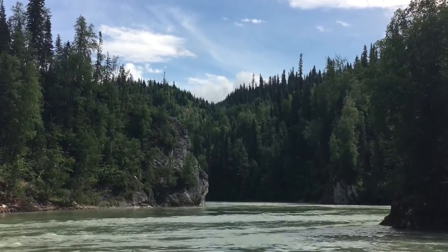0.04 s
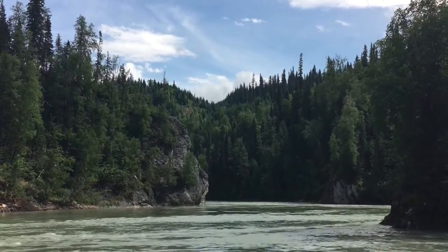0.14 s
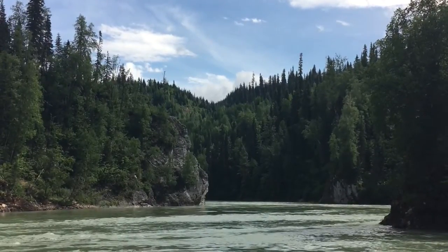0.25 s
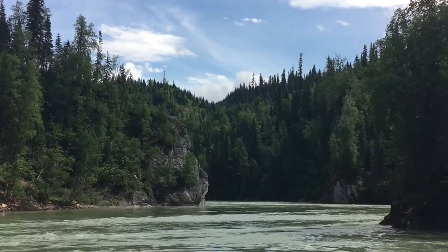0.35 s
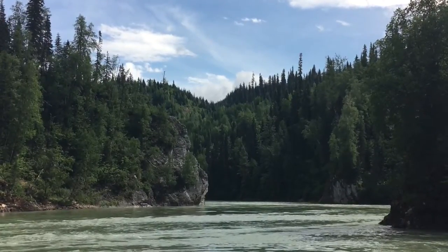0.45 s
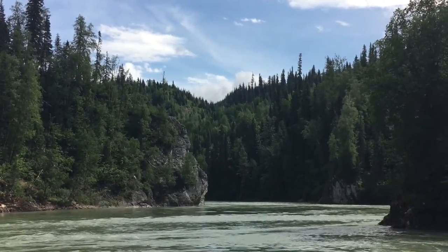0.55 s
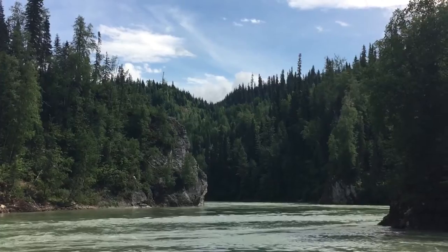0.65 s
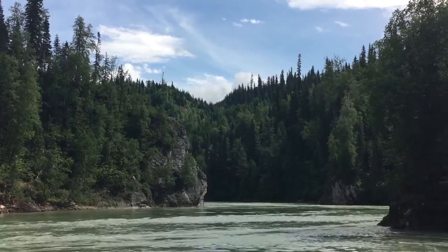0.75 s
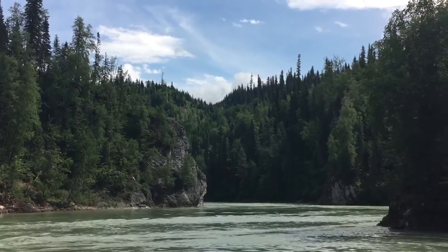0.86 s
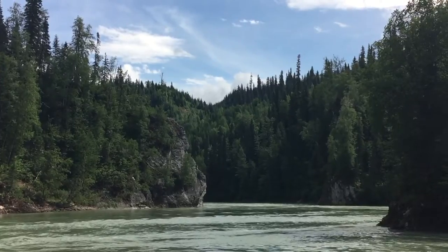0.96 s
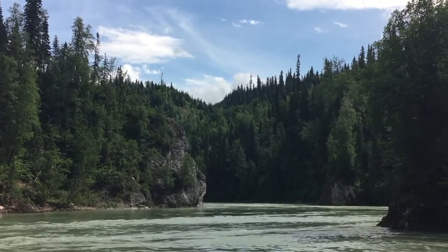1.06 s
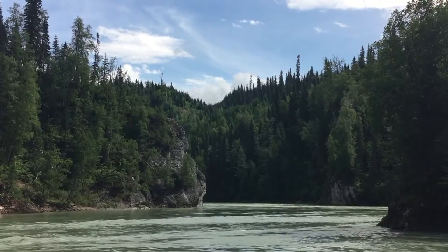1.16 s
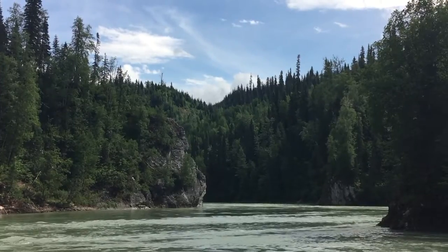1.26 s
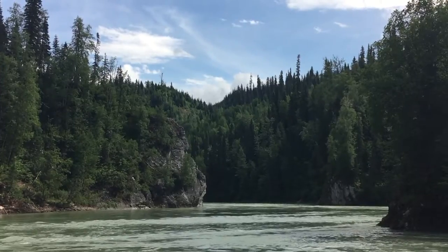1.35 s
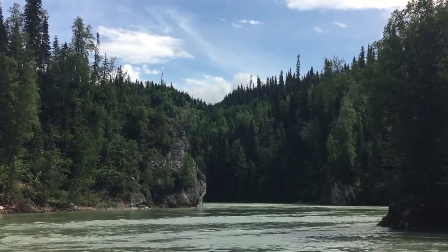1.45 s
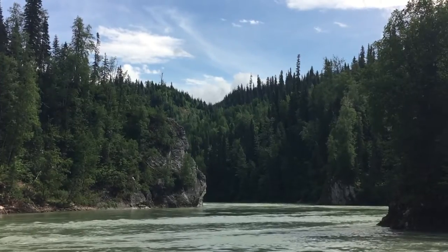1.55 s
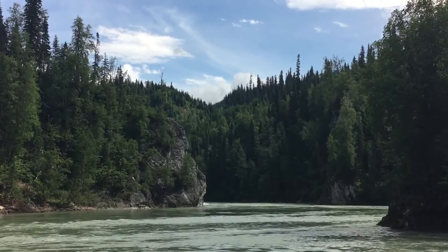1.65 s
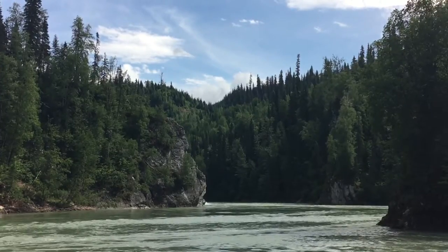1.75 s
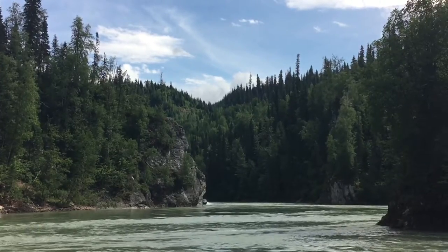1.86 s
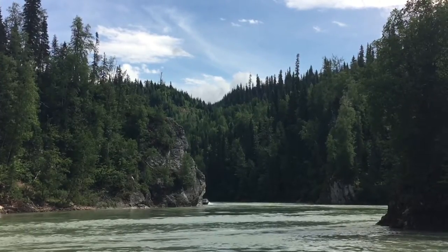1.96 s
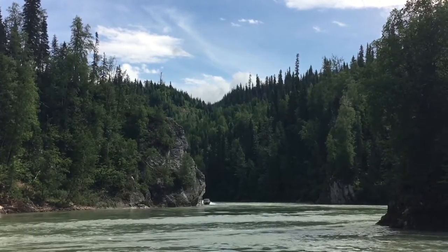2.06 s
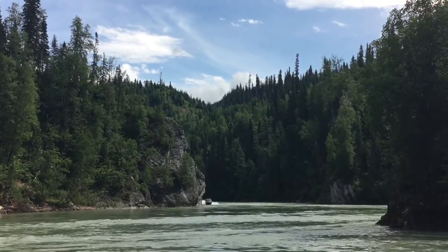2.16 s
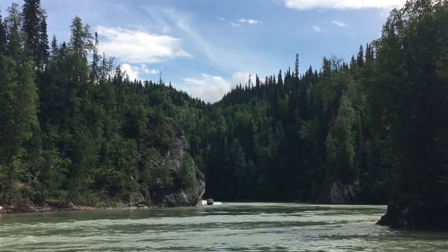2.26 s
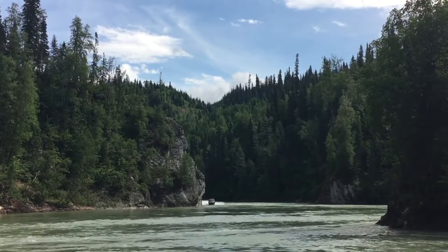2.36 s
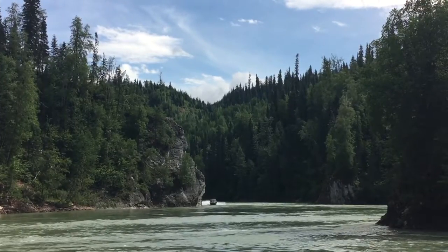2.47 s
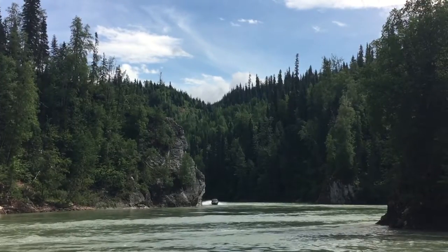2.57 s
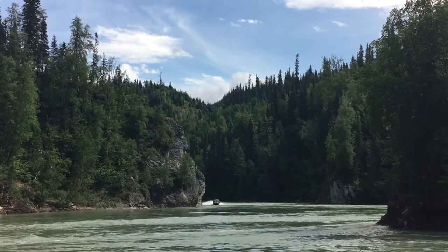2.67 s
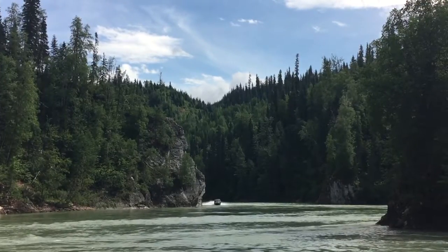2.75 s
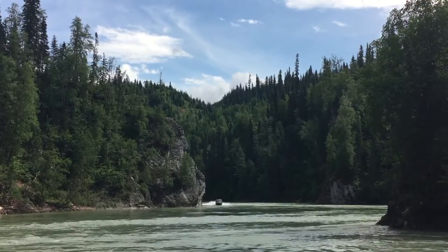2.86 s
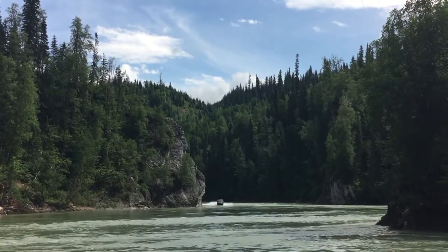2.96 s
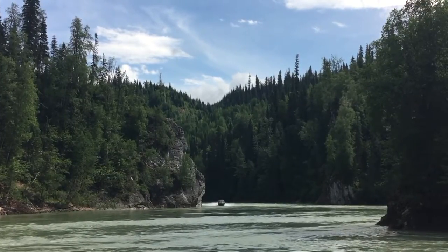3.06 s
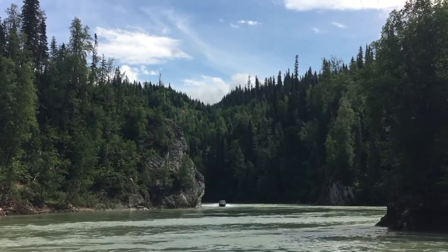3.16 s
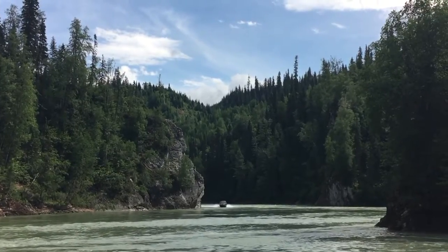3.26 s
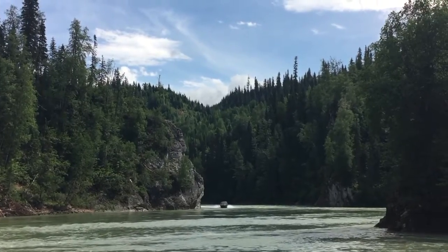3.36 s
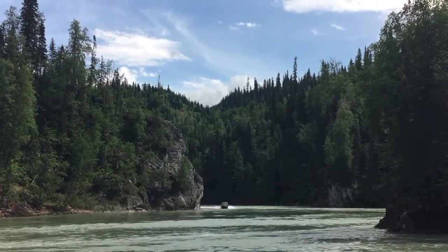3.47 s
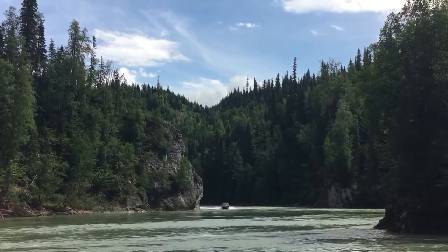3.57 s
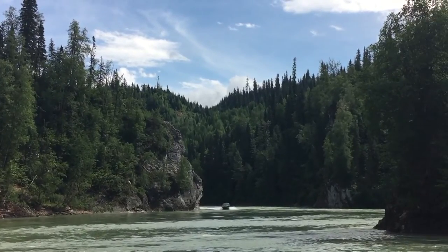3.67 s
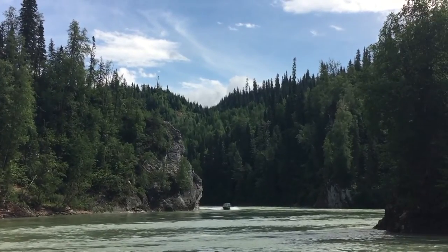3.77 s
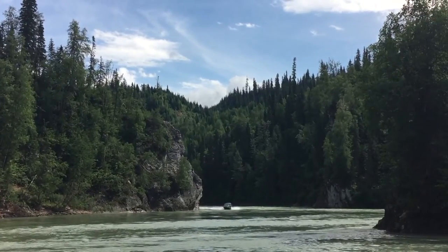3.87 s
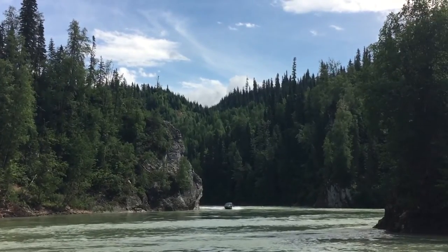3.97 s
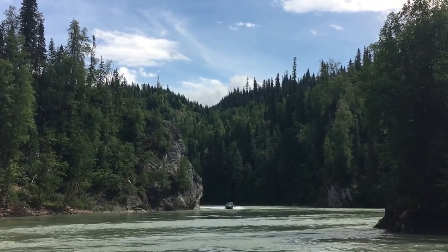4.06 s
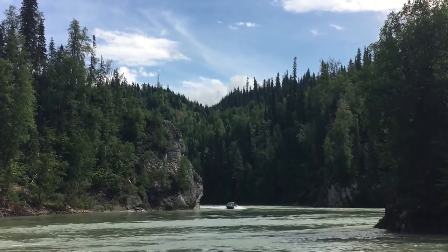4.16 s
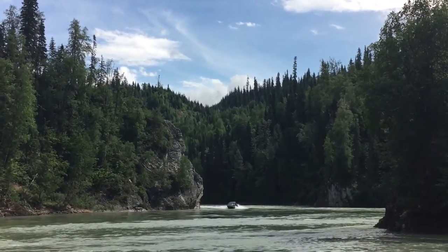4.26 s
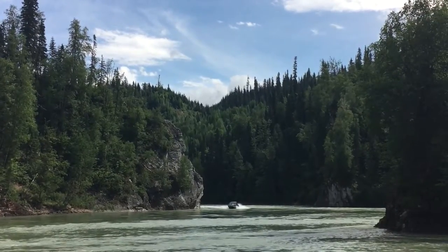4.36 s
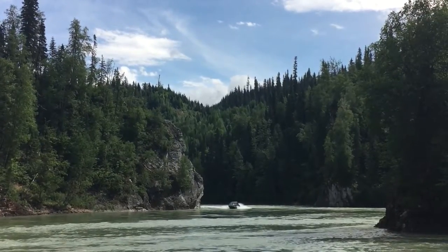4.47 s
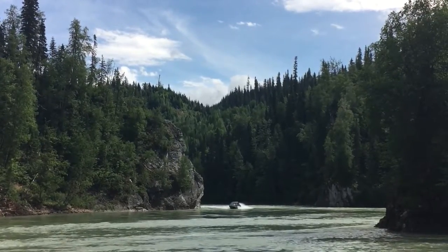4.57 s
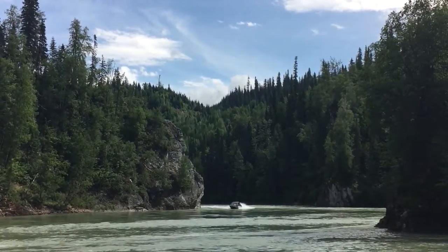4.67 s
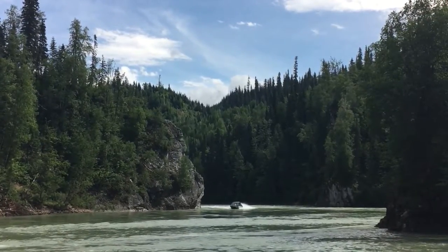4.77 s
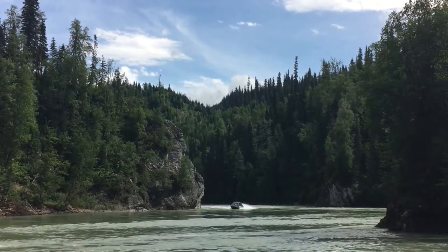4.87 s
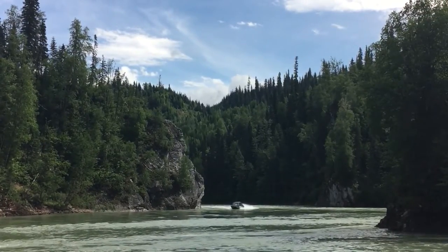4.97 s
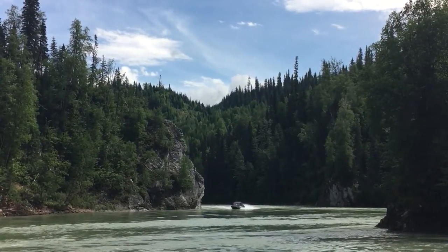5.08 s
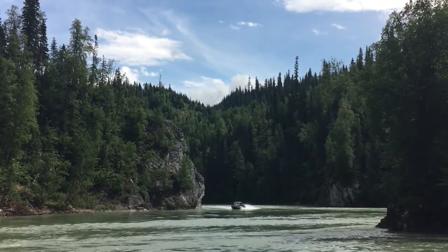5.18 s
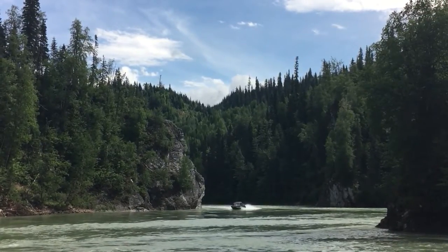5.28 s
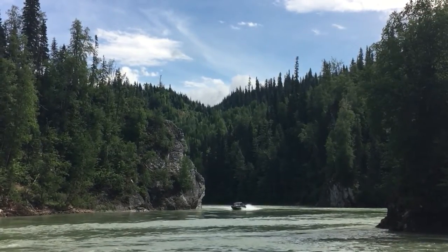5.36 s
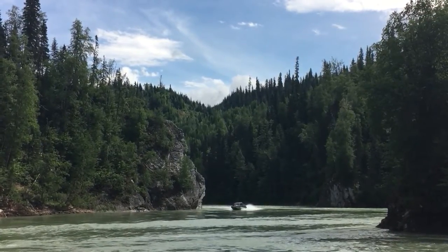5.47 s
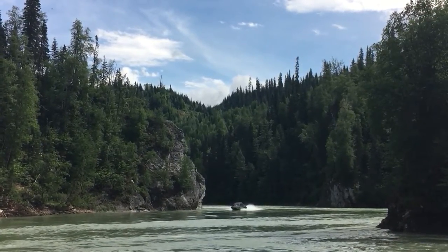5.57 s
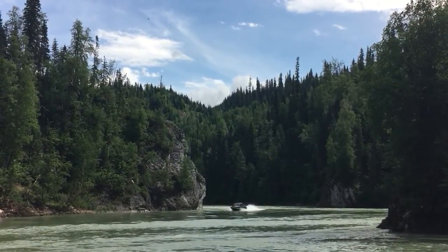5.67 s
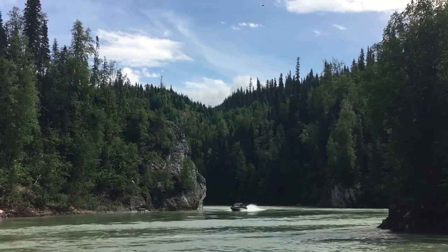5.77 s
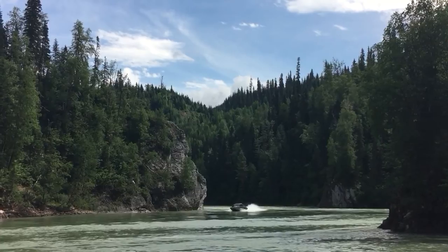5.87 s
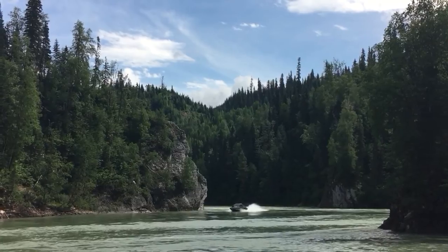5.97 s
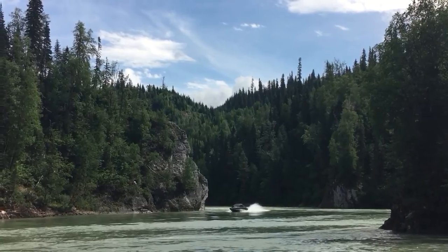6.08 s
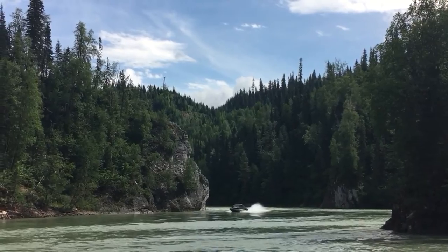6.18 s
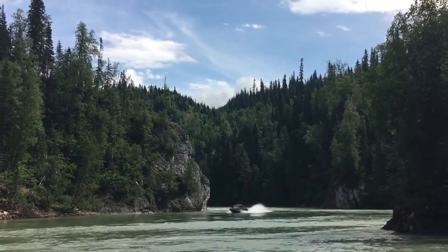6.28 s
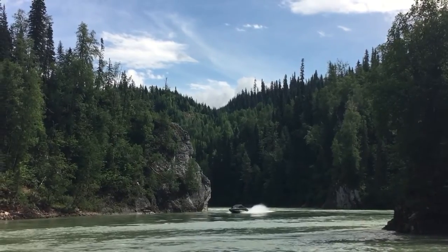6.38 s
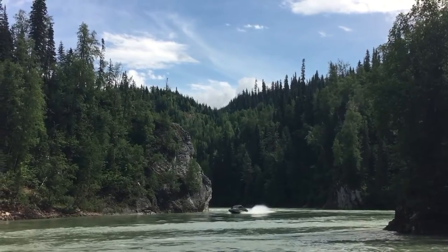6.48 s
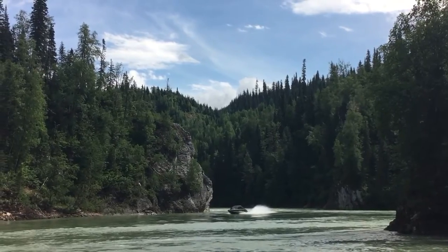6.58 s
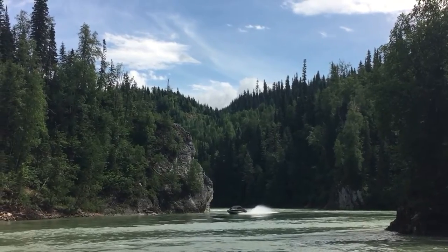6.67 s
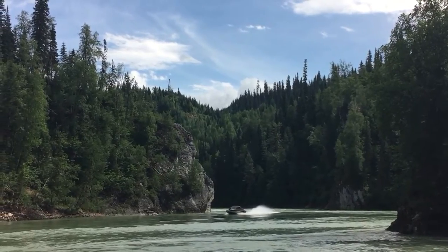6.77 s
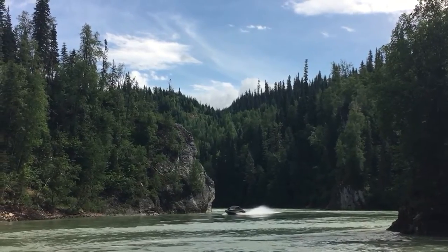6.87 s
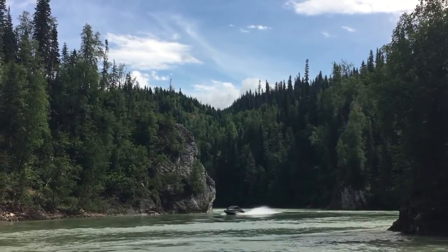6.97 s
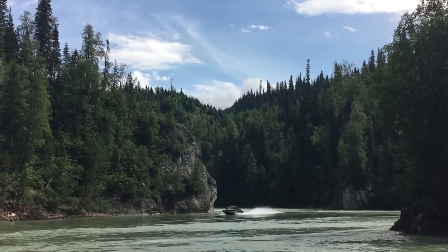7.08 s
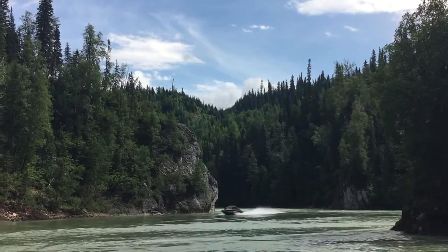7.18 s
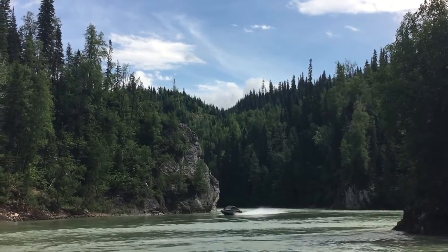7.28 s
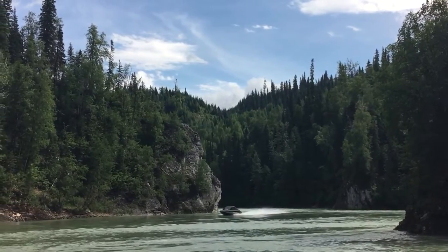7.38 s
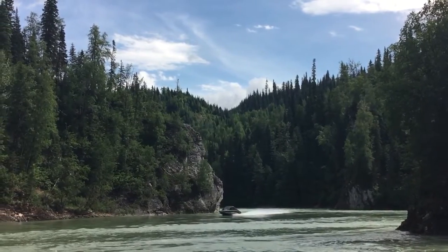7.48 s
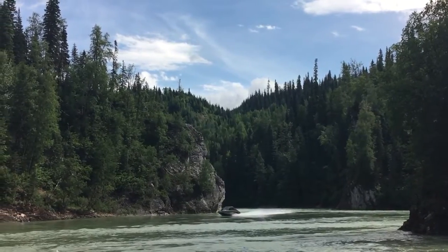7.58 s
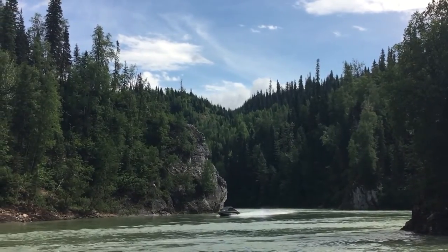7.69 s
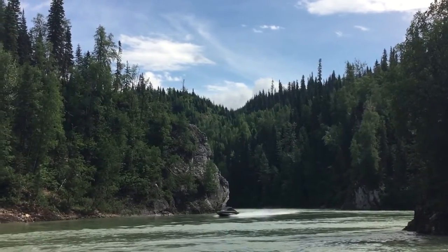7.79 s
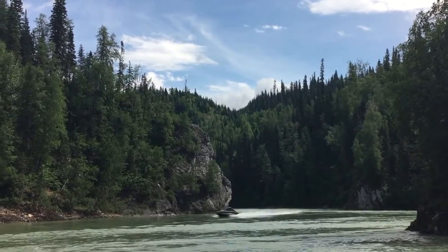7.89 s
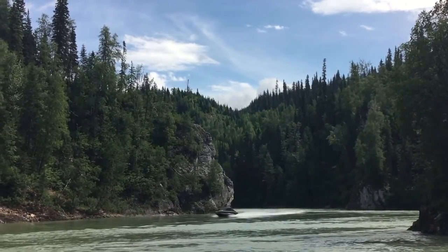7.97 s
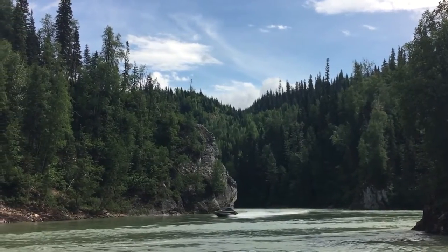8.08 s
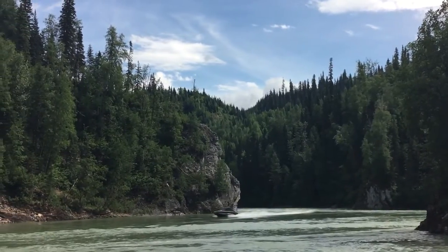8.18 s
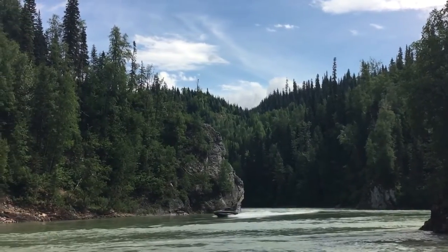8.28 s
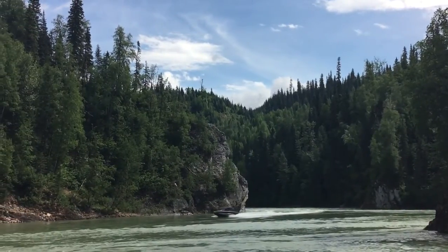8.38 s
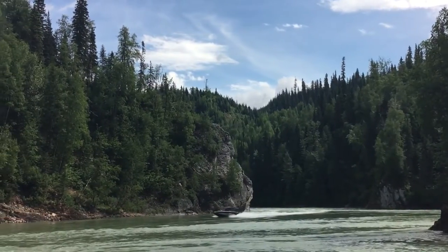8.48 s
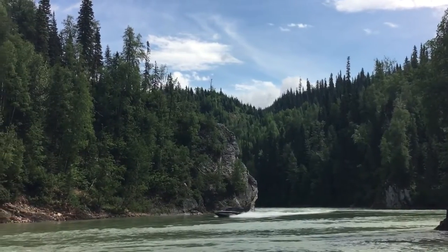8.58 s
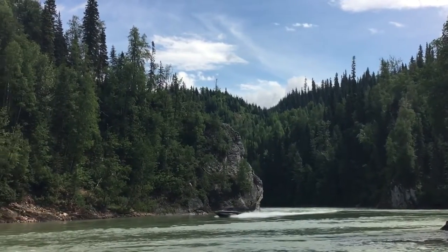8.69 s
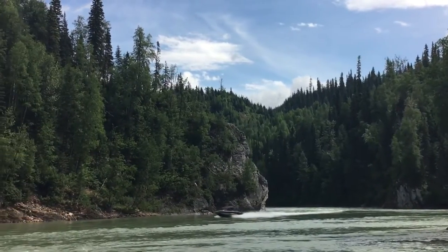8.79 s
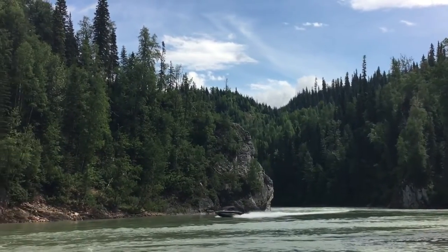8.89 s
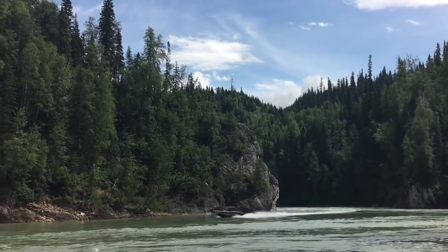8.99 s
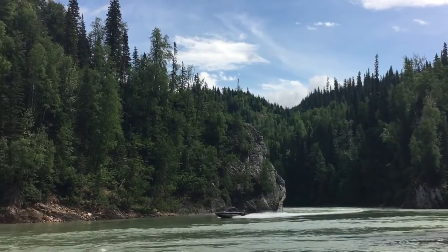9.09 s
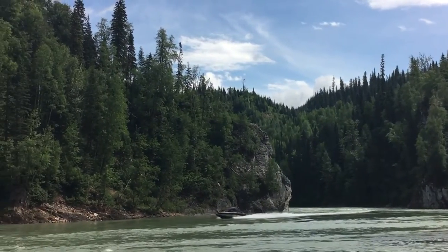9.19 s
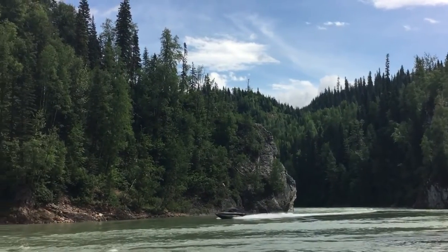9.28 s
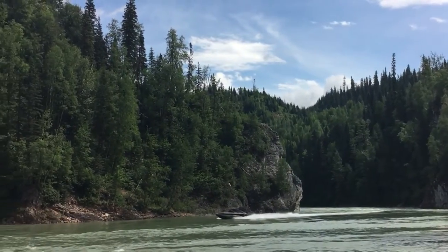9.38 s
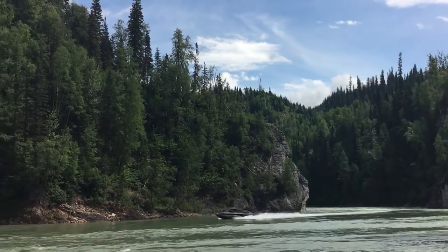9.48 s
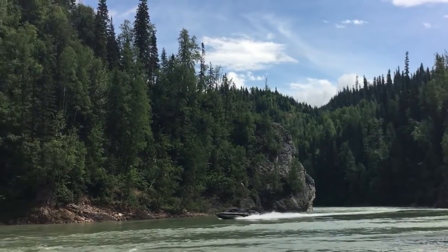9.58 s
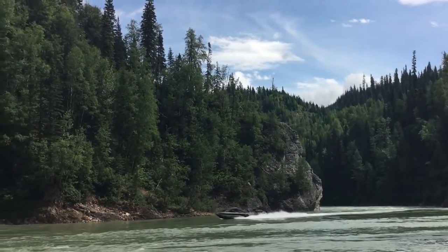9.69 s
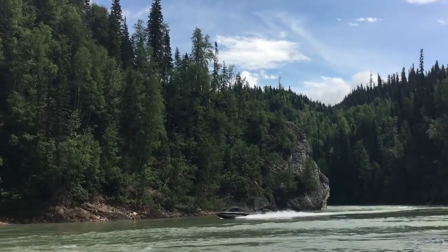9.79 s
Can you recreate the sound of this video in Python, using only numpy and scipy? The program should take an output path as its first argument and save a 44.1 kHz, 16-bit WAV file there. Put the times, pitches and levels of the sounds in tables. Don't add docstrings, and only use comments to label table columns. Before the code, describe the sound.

A jet boat motor grows from a faint low drone to a loud throbbing roar over hissing river water, with tiny drips ticking close by.

```python
import sys
import numpy as np
from scipy import signal
from scipy.fft import rfft, irfft, next_fast_len
from scipy.io import wavfile
from scipy.ndimage import uniform_filter1d, map_coordinates

SR = 44100
rng = np.random.default_rng(int(sys.argv[2]) if len(sys.argv) > 2 else 0)


def undo_db(level):
    steps = np.asarray(level, float) / 20
    return 10 ** steps


def wrap_up_sound(samples):
    columns = np.atleast_2d(samples).T
    tamed = np.clip(columns, -1, 1)
    steps = np.round(tamed * 32767).astype(np.int16)
    wavfile.write(sys.argv[1], SR, steps)


N = 433944


def unit(x):
    return x / np.sqrt(np.mean(x ** 2) + 1e-20)


def curves(rows):
    s, *cols = np.transpose(rows)
    return [np.interp(np.arange(N) / SR, s, c) for c in cols]


def wobble(rate):
    steps = np.arange(0, N + 64, 64)
    knots = rng.standard_normal(int(N * rate / SR) + 4)
    return np.interp(np.arange(N), steps, map_coordinates(knots, [steps * rate / SR]))


def filtered(x, response):
    m = next_fast_len(N + 8192)
    return irfft(rfft(x, m) * response(np.fft.rfftfreq(m, 1 / SR)), m)[:N]


def rush(spectrum, patchy_db, streak_db=0):
    z = signal.stft(rng.standard_normal(N), nperseg=512)[2]
    field = uniform_filter1d(rng.standard_normal(z.shape), size=8, axis=0)
    field = uniform_filter1d(field, size=8, axis=1)
    streaks = uniform_filter1d(rng.standard_normal(z.shape), size=14, axis=1)
    gain_db = patchy_db * unit(field) + streak_db * unit(streaks)
    noise = signal.istft(z * undo_db(gain_db), nperseg=512)[1][:N]
    f, db = np.transpose(spectrum)

    def colour(hz):
        return undo_db(np.interp(np.log(hz + 1), np.log(f), db, left=-120, right=-120))

    return unit(filtered(noise, colour))


# (time [s], engine cycles [Hz], nearness [dB], firing order 5 level [dB])
BOAT_RUN = [(0, 25.64, -30, -45), (.48, 25.75, -31, -45), (.96, 25.8, -24, -39), (1.68, 25.55, -23.5, -39),
            (2.1, 25.65, -19, -41), (2.64, 25.9, -18, -31.5), (2.9, 26.08, -16, -40),
            (3.15, 26.25, -12.5, -32), (3.72, 25.87, -10, -51), (4.25, 25.68, -11.5, -32),
            (4.68, 25.55, -11.5, -29), (5.04, 28.5, -9.5, -28.5), (5.7, 29.32, -5, -26.5),
            (6.66, 29.35, -5, -27.5), (6.96, 30.39, -5.5, -29), (7.9, 30.18, -1.5, -31.5),
            (9.0, 29.98, -2, -30.5), (9.84, 29.78, 0, -44)]
CRUISE_HZ, OPEN_HZ = 25.75, 28.82
TURN_S, TURN_LASTS_S = 5.12, 4.3


def controls():
    cycle_hz, near_db, firing_db = curves(BOAT_RUN)
    throttle = np.clip((cycle_hz - CRUISE_HZ) / (OPEN_HZ - CRUISE_HZ), 0, 1)
    broadside = np.clip((np.arange(N) / SR - TURN_S) / TURN_LASTS_S, 0, 1)
    return cycle_hz, near_db, firing_db, throttle, broadside


# (level near at cruise [dB], slope with nearness [dB/dB],
# change at full throttle [dB], change when broadside [dB])
ENGINE_ORDERS = [
    (-37, 1.0, -0.4, -0.2),
    (-55.5, 0.23, 1.5, 3.5),
    (-45, 0.7, -0.6, 10.5),
    (-51, 0.76, 18.5, -2.5),
    (-38, 0.9, -5, -11),
    (-27, 1.47, -26.5, -8),
]
# (time [s], lag behind the straight path [waves], echo level [dB])
CLIFF_PATH = [(0, -.3, -45), (.36, 2.04, -51), (.8, 3.5, -45), (1.93, 12.55, -44), (2.12, 13.35, -40),
              (2.73, 17.7, -52), (3.58, 20.88, -38), (3.98, 22.1, -52), (4.2, 22.85, -39),
              (4.52, 24.7, -38), (4.7, 25.1, -33), (5.02, 28.6, -36), (5.35, 29.67, -33), (5.58, 31.9, -35),
              (6.1, 34.7, -37), (6.68, 39.0, -34), (6.9, 41.5, -42), (9.84, 67.4, -41)]
CLIFF_ECHO = [-16, -14, -19.5, -18, -10.5, -8.5, -4]
CAVITY_HZ, CAVITY_WIDTH_HZ, CAVITY_DB = 89.8, 3.5, 15.5


def exhaust(cycle_hz, near_db, firing_db, throttle, broadside):
    order_db = []
    for db, grows, open_db, side_db in ENGINE_ORDERS:
        order_db.append(db + grows * near_db + open_db * throttle + side_db * broadside)
    order_db[1] += CAVITY_DB / (1 + ((3 * cycle_hz - CAVITY_HZ) / CAVITY_WIDTH_HZ) ** 2)
    order_db.insert(3, firing_db)
    behind, echo_db = curves(CLIFF_PATH)
    angle = 2 * np.pi * np.cumsum(cycle_hz) / SR
    lag, valley_lag = .9, 1.25
    drone = undo_db(echo_db + 1.2 * wobble(4)) * np.cos(5 * angle - lag - 2 * np.pi * behind)
    tenth_db = (order_db[5] + order_db[6]) / 2 - 9.0
    drone += undo_db(tenth_db + 2.6 * wobble(2.95)) * np.cos(10 * angle + 1.2 * wobble(6))
    for k, db, share_db in zip(range(2, 9), order_db, CLIFF_ECHO):
        phase = k * angle - lag - valley_lag * (k == 4) + 0.45 * (k != 5) * wobble(2.5)
        drone += undo_db(db + .75 * wobble(9)) * np.cos(phase)
        drone += undo_db(db + share_db + 4.0 * wobble(4.6)) * np.cos(.94 * k * angle + 2.33 * wobble(6))
    return np.sqrt(2) * drone, angle


# (frequency [Hz], level [dB])
BOOM_SPECTRUM = [(15, -18.5), (30, -14.5), (45, -8), (60, -6.5), (100, 0.5), (140, 6), (200, 6.5),
                 (240, -8), (330, -14.5), (500, -43.5)]


def canyon(near_db):
    return undo_db(-39.5 + 0.38 * near_db) * rush(BOOM_SPECTRUM, patchy_db=2.6)


# (time [s], swell [dB], rise [s], fall [s])
HULL_SLAPS = [(2.35, 0, .005, .04), (2.66, 2.5, 0.084, 0.076), (3.04, 4, 0.056, 0.079),
              (3.862, 9.5, 0.011, 0.024), (4.09, -0.5, 0.0077, .03), (6.21, 4.5, 0.0087, 0.019),
              (6.97, 2.5, 0.051, 0.071), (7.79, 2.5, 0.028, 0.041), (8.0, 4, 0.0095, 0.018),
              (8.29, 4.5, .015, 0.017), (8.86, 4, 0.028, 0.043), (9.38, 6, 0.04, 0.071)]


def swell():
    t = np.arange(0, N + 32, 32) / SR
    gain_db = 0
    for s, db, rise, fall in HULL_SLAPS:
        gain_db = gain_db + db * np.exp(np.minimum((t - s) / rise, (s - t) / fall))
    return np.interp(np.arange(N) / SR, t, gain_db)


# (time [s], level [dB])
CHURN = [(0, -13.5), (.71, -14), (1.15, -11), (1.61, -12), (2.25, -8.5), (3.01, -3.5), (3.12, -0.5),
         (3.31, -4), (4.44, -3), (4.9, -3.5), (5.23, -2), (6.71, -2.5), (7.01, -1.4), (7.84, -1),
         (8.38, 0.3), (9.23, -0.4), (9.84, 1)]
# (frequency [Hz], level per Hz [dB])
ROAR_SPECTRUM = [(150, -15.5), (230, 3.5), (330, 0.5), (420, 4), (640, 0.5), (780, -8.5), (920, -3.5),
                 (1400, -6), (1900, -7), (2200, -7), (2450, -18.5), (3500, -47)]
# (frequency [Hz], level [dB])
WASH_SPECTRUM = [(1800, -33), (2500, 3), (2900, -2.5), (3300, 1), (4300, -2.5), (4800, -13), (6500, -49)]
# (frequency [Hz], level [dB])
SPRAY_SPECTRUM = [(3500, -30), (4700, -1.5), (5600, 0), (6800, -6), (7400, -11), (9700, -14.5),
                  (10500, -23), (12000, -21), (14000, -34)]
WASH_RULE, SPRAY_RULE = (-56, 0.76, 2.3), (-69, 0.29, 7.2)
PLANING_HZ, PLANING_DB_PER_HZ = 29.24, 3


def bounce(hz):
    return 1 - .5 * np.exp(-2j * np.pi * hz / 398) / (1 + (hz / 2600) ** 2 + (450 / (hz + 1)) ** 2)


def wake(angle, cycle_hz, broadside):
    churn_db, = curves(CHURN)
    wash_db, spray_db = (db + grows * churn_db + side_db * broadside
                         for db, grows, side_db in (WASH_RULE, SPRAY_RULE))
    spray_db += PLANING_DB_PER_HZ * np.maximum(cycle_hz - PLANING_HZ, 0)
    beat = 1 + 0.03 * np.cos(5 * angle)
    chop, slaps, spatter = wobble(14), swell(), wobble(22)
    roar = beat * rush(ROAR_SPECTRUM, patchy_db=1.03, streak_db=2.0)
    roar = undo_db(-39 + churn_db + slaps + 0.49 * chop) * unit(filtered(roar, bounce))
    wash_db = wash_db + 1.27 * slaps + 0.26 * chop + 0.49 * spatter
    wash = undo_db(wash_db) * rush(WASH_SPECTRUM, patchy_db=1.7, streak_db=3.0)
    spray_db = spray_db + 0.68 * slaps + 0.47 * chop + 1.4 * spatter
    spray = undo_db(spray_db) * rush(SPRAY_SPECTRUM, patchy_db=1.6, streak_db=2.6)
    return roar + wash + spray


# (time [s], peak level [dB])
GURGLE_FLECKS = [
    (4.37, -51),
    (4.52, -44),
    (5.11, -48),
    (5.3, -47),
    (6.03, -48.5),
]
# (frequency [Hz], level [dB])
INTAKE_SPECTRUM = [(380, -49), (500, -13), (560, 4.5), (610, -7), (760, -45.5)]
FLECK_DB_PER_S, GURGLE_DB, GURGLE_OPEN_DB = 103, -70.5, 6.5


def intake(throttle):
    t = np.arange(N) / SR
    level = undo_db(GURGLE_DB + GURGLE_OPEN_DB * throttle)
    for s, db in GURGLE_FLECKS:
        level = level + undo_db(db - FLECK_DB_PER_S * np.abs(t - s))
    return level * undo_db(0.88 * wobble(13)) * rush(INTAKE_SPECTRUM, patchy_db=3.5)


# (time [s], level [dB])
RIVER_LEVEL = [
    (0.0, -75.5),
    (6.69, -84),
    (7.1, -78.5),
    (9.84, -91),
]
# (frequency [Hz], level [dB])
HISS_SPECTRUM = [(200, 5), (500, 26.5), (1100, 31.5), (2000, 25), (3200, 17), (5000, 0.5), (9500, 1.5),
                 (10500, -6.5), (11500, -1), (13500, -9.5), (15800, -9.5)]


def river():
    level_db = curves(RIVER_LEVEL)[0] + 25.5 + 0.92 * wobble(9.7)
    return undo_db(level_db) * rush(HISS_SPECTRUM, patchy_db=1.0, streak_db=2.0)


BUBBLES, BUBBLE_HZ, BUBBLE_SPREAD, BUBBLE_CYCLES = 420, 4000, .45, 40


def bubbles():
    start = rng.uniform(0, N, BUBBLES).astype(int)
    pitch = rng.standard_normal(BUBBLES)
    size = rng.exponential(size=BUBBLES)
    hz = np.clip(BUBBLE_HZ * np.exp(BUBBLE_SPREAD * pitch), 900, 12000)[:, None]
    t = np.arange(1200) / SR
    life = np.minimum(t * hz / BUBBLE_CYCLES + t / 0.044, 1)
    strength = undo_db(4 * np.minimum(size, 2)[:, None]) * (hz / BUBBLE_HZ) ** -1.6
    ring = np.sin(2 * np.pi * hz * t * (1 + .015 * life))
    notes = strength * np.sin(np.pi * life) ** 2 * ring
    places = start[:, None] + np.arange(len(t))
    return unit(np.bincount(places.ravel(), notes.ravel(), N + len(t))[:N])


TICKS, TICK_DB, TICK_T60_S = 110, -63, .003


def mist():
    hits, t = np.zeros(N), np.arange(200) / SR
    hits[rng.integers(0, N, TICKS)] = undo_db(TICK_DB + 3.5 * np.minimum(rng.exponential(size=TICKS), 2))
    spit = signal.fftconvolve(hits, undo_db(-60 * t / TICK_T60_S))[:N] * rng.standard_normal(N)
    return filtered(spit, lambda hz: 1 / (1 + (4500 / (hz + 1)) ** 4) / (1 + (hz / 11000) ** 2))


# (time [s], peak level [dB], pitch [Hz])
LARGE_DROPS = [
    (0.189, -42, 2970),
    (0.409, -39, 3280),
    (0.55, -47, 3100),
    (1.6342, -42, 3450),
    (2.3466, -40, 3210),
    (4.556, -37, 3896),
    (8.1858, -35.5, 3432),
    (8.239, -39, 2800),
    (8.4916, -37, 4025),
]
# (time [s], peak level [dB], pitch [Hz])
MIDDLE_DROPS = [(0.0199, -52, 5350), (0.2867, -47, 7970), (0.3423, -44.5, 5820), (0.55, -41, 6170),
                (0.561, -44.5, 6600), (0.5738, -43, 6600), (0.6579, -47, 6660), (0.772, -38, 6960),
                (0.8959, -51, 5640), (1.494, -44, 4595), (3.022, -56, 5770), (3.3064, -50, 6290),
                (3.6935, -46.5, 5270), (3.7893, -56, 5050), (4.239, -39.5, 6280), (4.5481, -52, 5420),
                (5.0575, -51, 5520), (5.0888, -50, 5880), (5.1168, -43, 6230), (5.9678, -54, 5800),
                (7.108, -49, 6593), (7.462, -52, 6300), (7.9548, -48, 5025), (8.2806, -36.5, 5570),
                (9.179, -41, 5150)]
# (time [s], peak level [dB], pitch [Hz])
SMALL_DROPS = [(0.2813, -54, 8540), (0.5501, -48, 8500), (0.7721, -50, 9810), (1.05, -56, 9000),
               (1.248, -55, 9400), (2.9976, -52, 11300), (3.022, -45, 10960), (3.1263, -49.5, 8494),
               (3.694, -49.5, 9570), (3.8004, -55, 9050), (4.2383, -47, 8890), (4.4892, -53, 10800),
               (4.5925, -60.5, 11810), (5.0639, -58, 8520), (5.0794, -52.5, 11000), (5.1342, -54, 9590),
               (5.208, -51.5, 9830), (7.043, -57, 11000), (7.096, -56.5, 12000), (7.109, -57, 12200),
               (8.2003, -51, 9310), (8.2472, -55, 9110), (8.2793, -42.5, 9500), (8.3424, -48, 9445),
               (9.0793, -55.5, 9570), (9.1795, -46, 8610)]
# (time [s], peak level [dB], pitch [Hz])
FINEST_DROPS = [(0.182, -61, 12700), (0.409, -63, 13400), (0.4803, -55, 12600), (0.5496, -59, 14300),
                (0.6404, -56, 12700), (3.0215, -61, 14600), (3.2615, -58, 13560), (3.3194, -55, 15320),
                (3.3578, -57, 13100), (4.2383, -59, 12100), (4.4887, -57.5, 15100), (4.9631, -67, 13300),
                (6.3759, -58.5, 13500), (7.7218, -57.5, 13700), (8.1848, -57.5, 13370),
                (8.2043, -55.5, 15620), (8.2472, -54.5, 15600), (8.2781, -55.5, 15700),
                (8.4836, -65, 14000), (8.4936, -61, 15050)]
SPLASHES, SPLASH_S, SPLASH_DB = 2, .03, -15


def drops():
    out, t = np.zeros(N + SR), np.arange(600) / SR
    # (drops, T60 [s], gain [dB], share of crack)
    sizes = ((LARGE_DROPS, .008, 0, .04), (MIDDLE_DROPS, .006, 1.5, .12),
             (SMALL_DROPS, .004, 4, .16), (FINEST_DROPS, .003, 7, .15))
    for rows, t60, gain_db, crack in sizes:
        for s, db, hz in np.add(rows, [.0008, 0, 0]):
            shape = undo_db(db + gain_db - 60 * t / t60) * (1 - np.exp(-t / 0.00013))
            detune, lag = rng.uniform(0.71, 1.2), rng.integers(20, 120)
            snap = crack * np.diff(rng.standard_normal(len(t) + 1))
            start = round(s * SR)
            out[start:][:len(t)] += shape * (np.sin(2 * np.pi * hz * t) + snap)
            out[start + lag:][:len(t)] += .45 * shape * np.sin(2 * np.pi * hz * detune * t)
            for late, higher, weaker_db in rng.uniform(-1, 1, size=(SPLASHES, 3)):
                at = max(round((s + SPLASH_S * late) * SR), 0)
                splash_hz = min(hz * 1.5 ** higher, 15500)
                splash = shape * np.sin(2 * np.pi * splash_hz * t)
                out[at:][:len(t)] += undo_db(SPLASH_DB + 6.5 * weaker_db) * splash
    return out[:N]


# (time [s], peak level [dB])
HULL_KNOCKS = [
    (3.8592, -31),
]
KNOCK_HZ, KNOCK_T60_S = 323, 0.017


def knocks():
    out, t = np.zeros(N + SR), np.arange(SR // 10) / SR
    modes = np.sin(2 * np.pi * KNOCK_HZ * t) + 0.42 * np.sin(2 * np.pi * 2.34 * KNOCK_HZ * t)
    for s, db in HULL_KNOCKS:
        out[round(s * SR):][:len(t)] += undo_db(db - 60 * t / KNOCK_T60_S) * modes
    return out[:N]


def scene():
    cycle_hz, near_db, firing_db, throttle, broadside = controls()
    drone, angle = exhaust(cycle_hz, near_db, firing_db, throttle, broadside)
    boat = drone + canyon(near_db) + wake(angle, cycle_hz, broadside) + intake(throttle)
    water = river() + undo_db(-69) * bubbles() + mist() + drops()
    return (boat + water + knocks())[None]


def low_pass(x):
    return signal.sosfilt(signal.butter(12, 15840, fs=SR, output="sos"), x)


def record(dry):
    hiss = undo_db(-78.5) * unit(np.diff(rng.standard_normal(N + 1)))
    return low_pass(dry + hiss)


dry = scene()
out = record(dry)
wrap_up_sound(out)
```